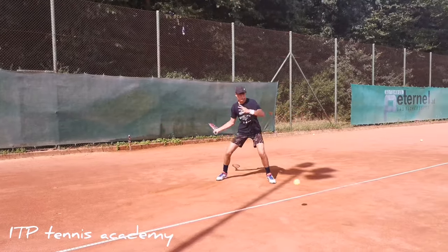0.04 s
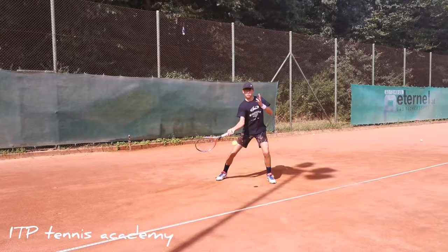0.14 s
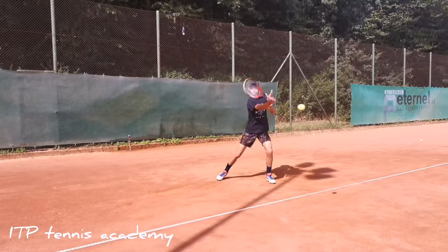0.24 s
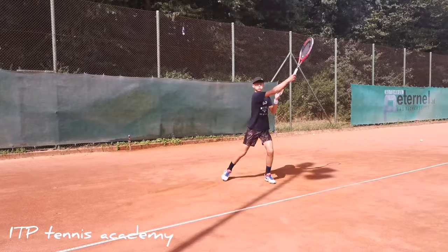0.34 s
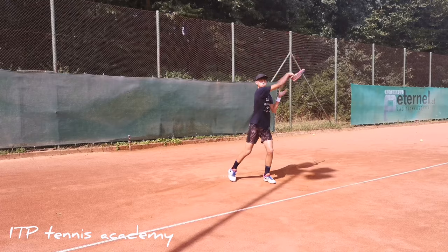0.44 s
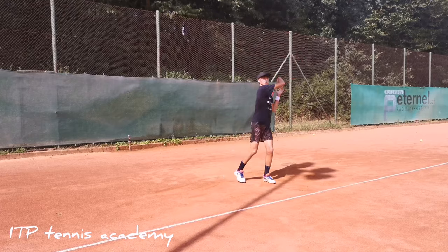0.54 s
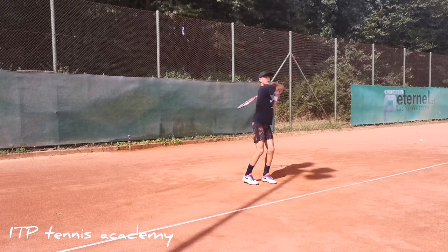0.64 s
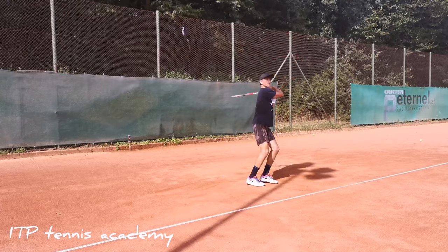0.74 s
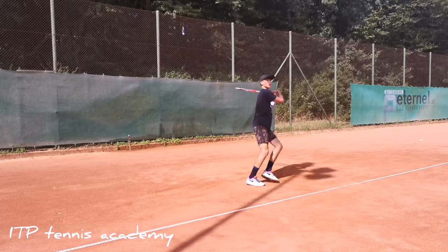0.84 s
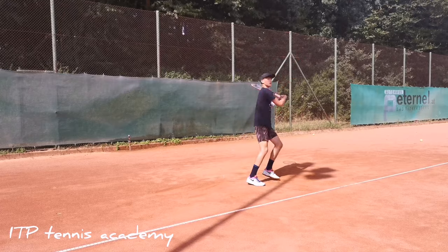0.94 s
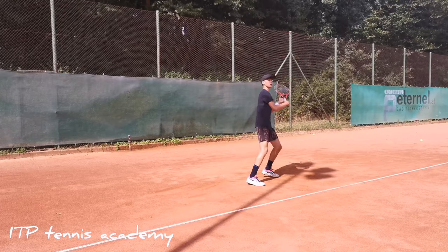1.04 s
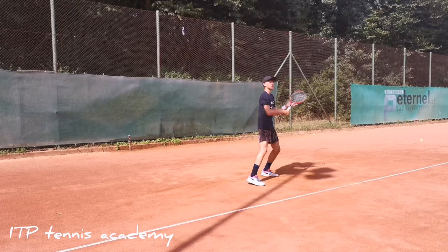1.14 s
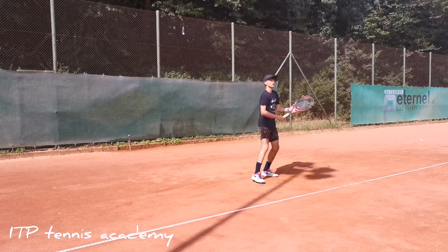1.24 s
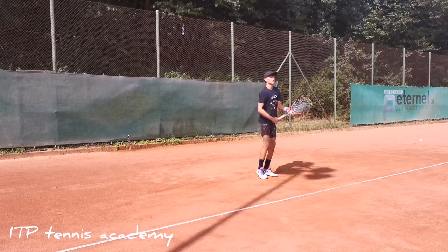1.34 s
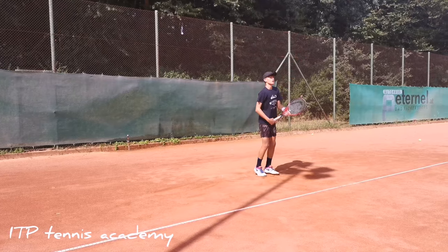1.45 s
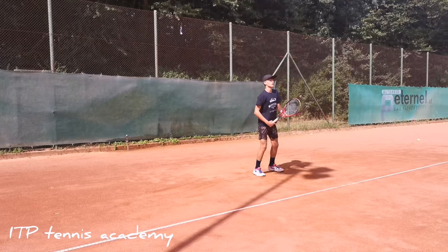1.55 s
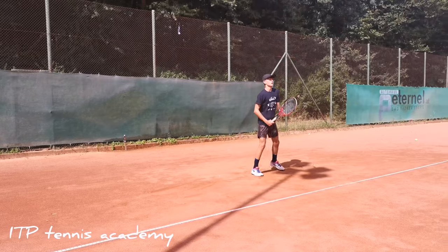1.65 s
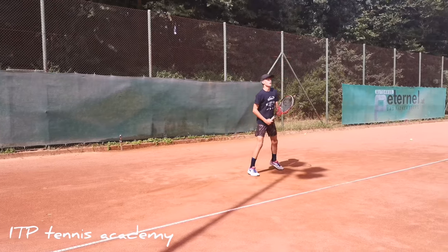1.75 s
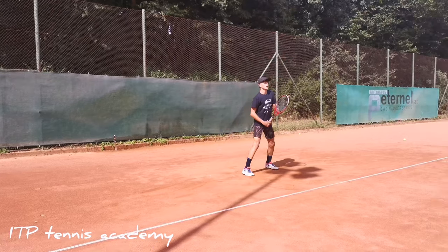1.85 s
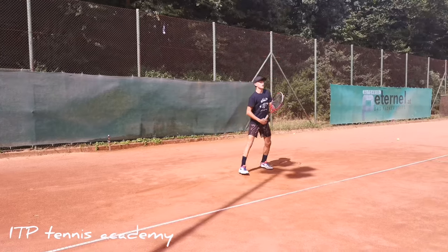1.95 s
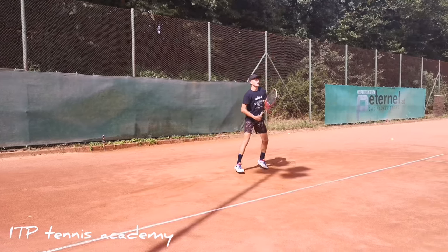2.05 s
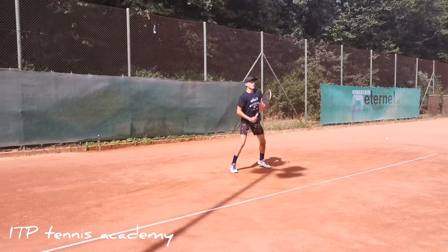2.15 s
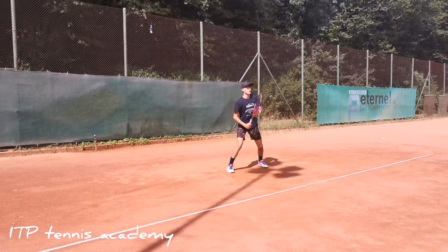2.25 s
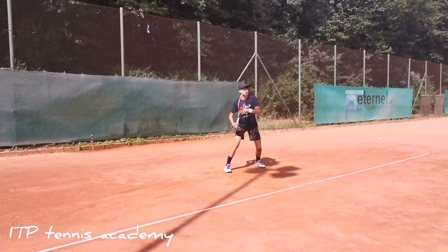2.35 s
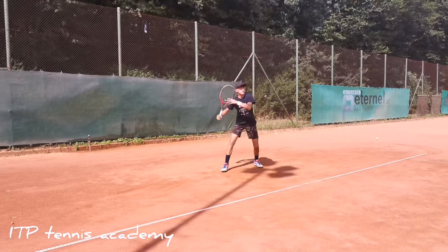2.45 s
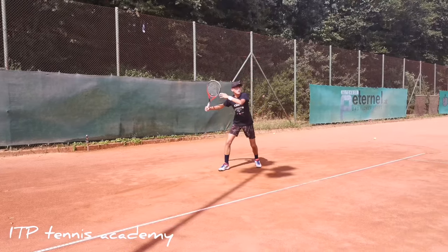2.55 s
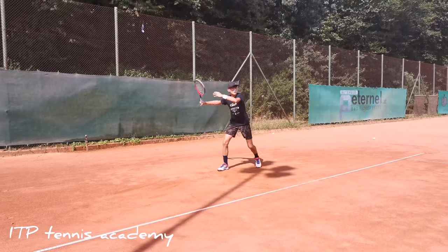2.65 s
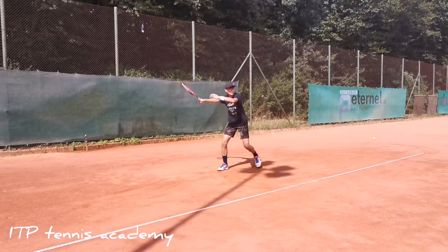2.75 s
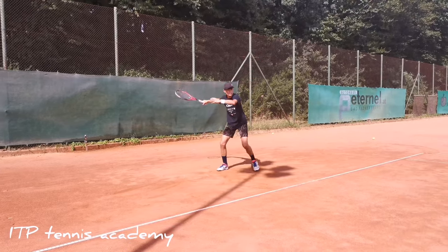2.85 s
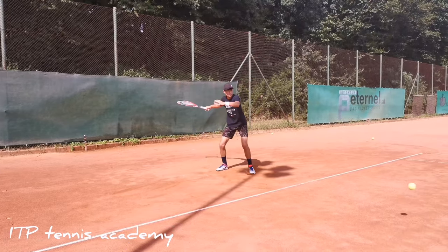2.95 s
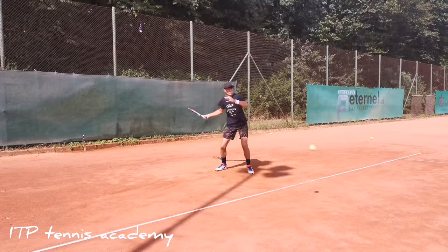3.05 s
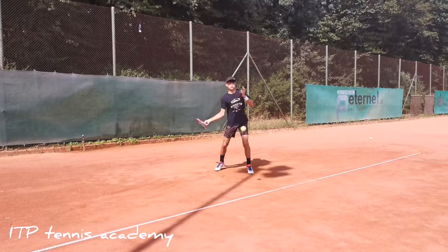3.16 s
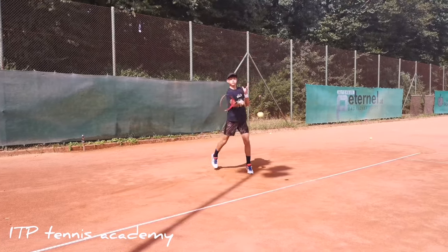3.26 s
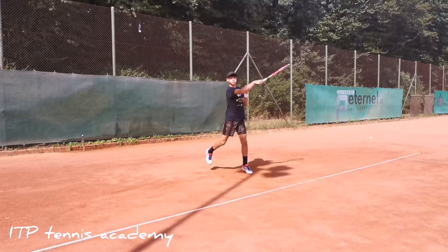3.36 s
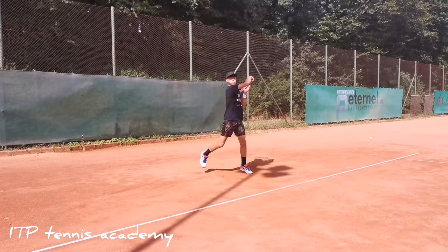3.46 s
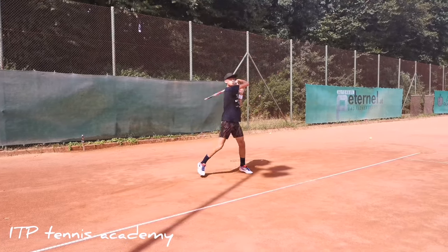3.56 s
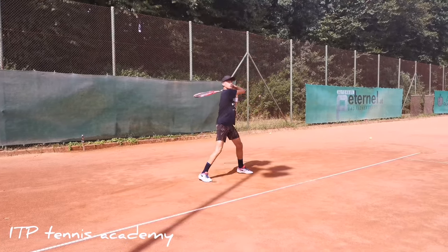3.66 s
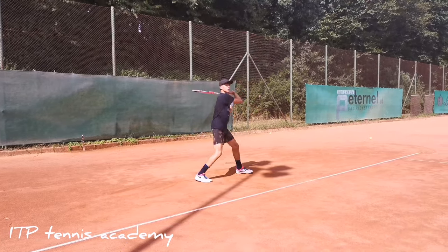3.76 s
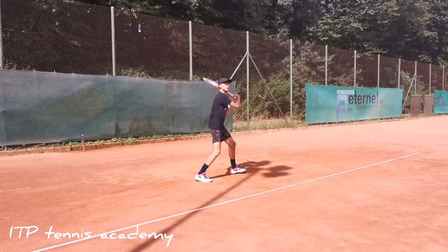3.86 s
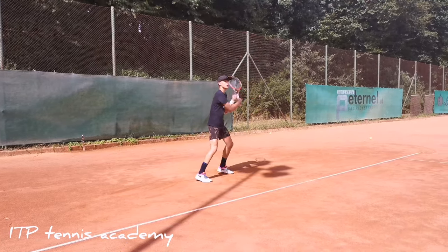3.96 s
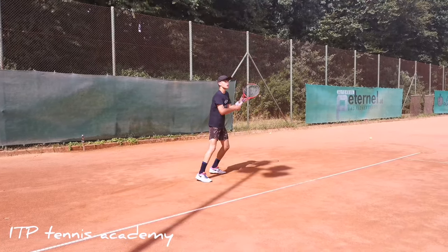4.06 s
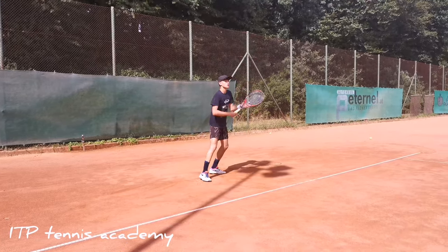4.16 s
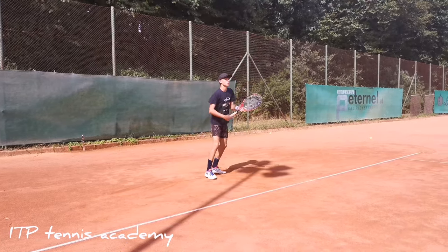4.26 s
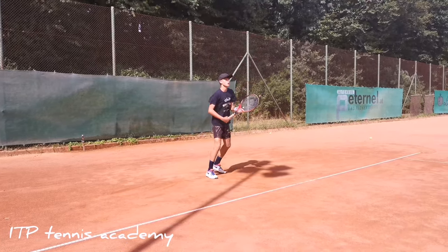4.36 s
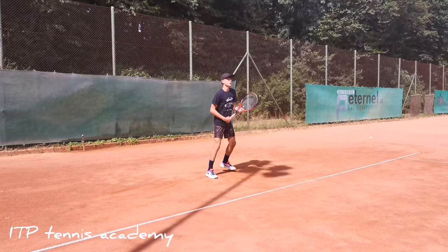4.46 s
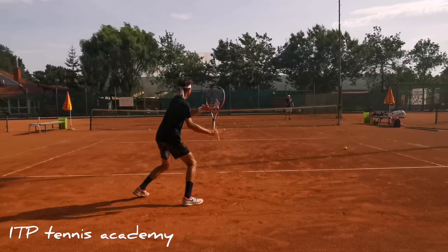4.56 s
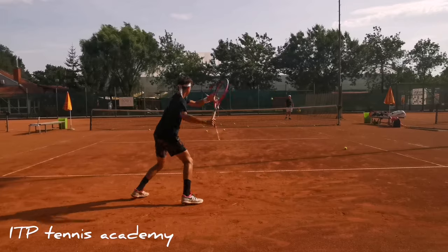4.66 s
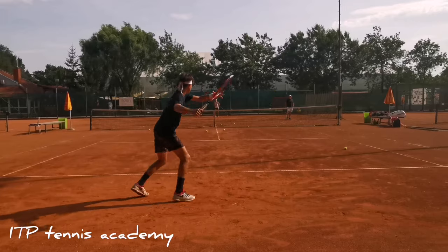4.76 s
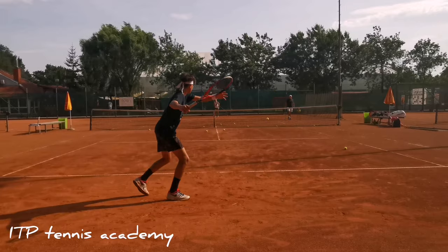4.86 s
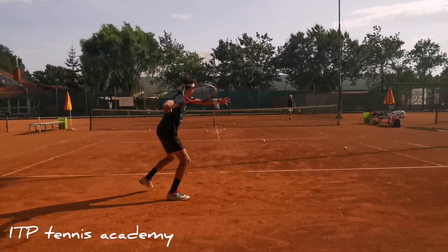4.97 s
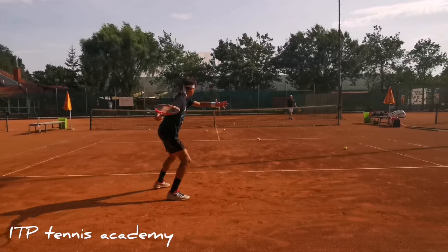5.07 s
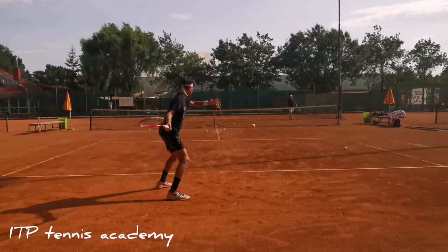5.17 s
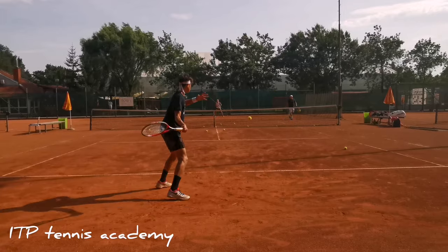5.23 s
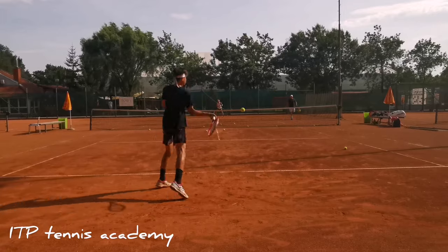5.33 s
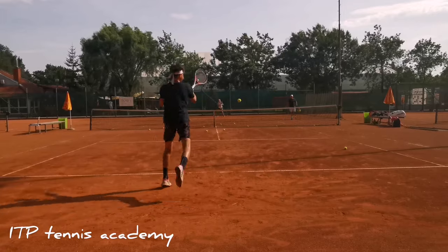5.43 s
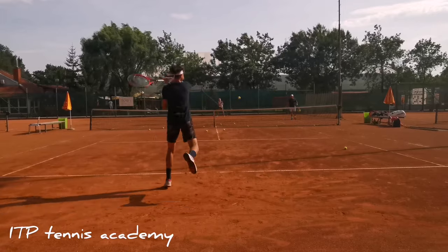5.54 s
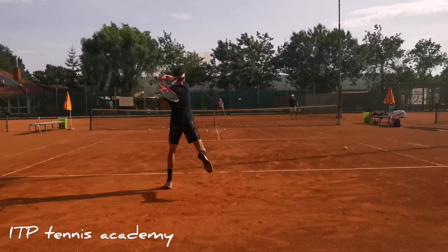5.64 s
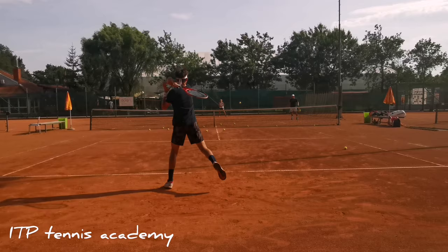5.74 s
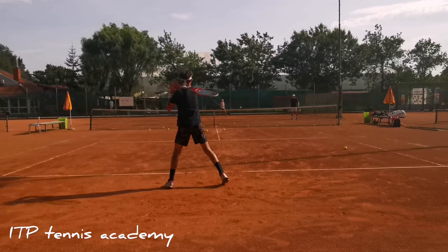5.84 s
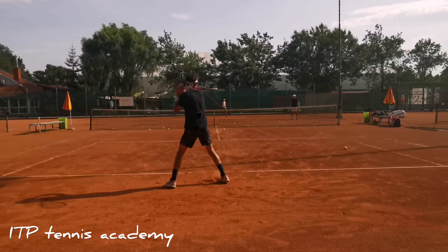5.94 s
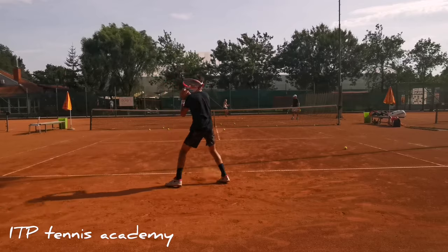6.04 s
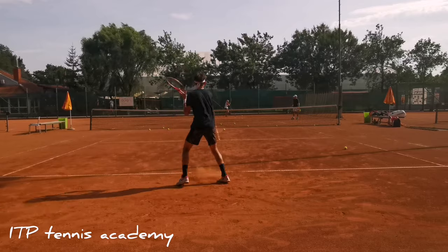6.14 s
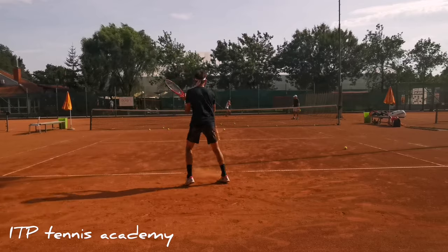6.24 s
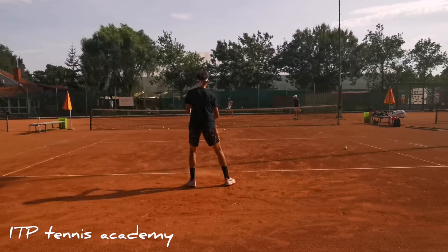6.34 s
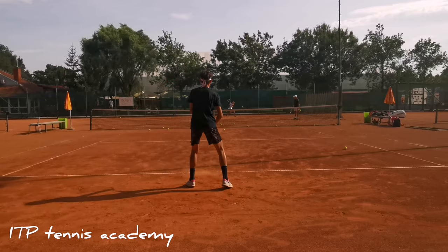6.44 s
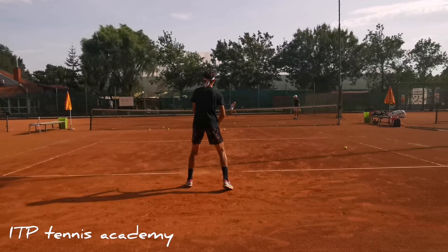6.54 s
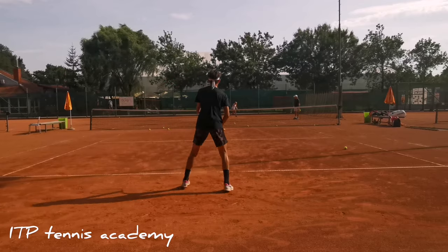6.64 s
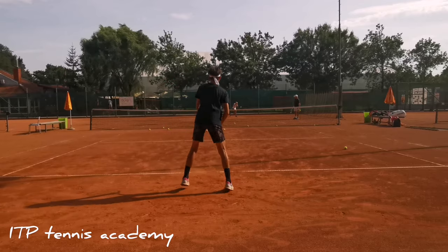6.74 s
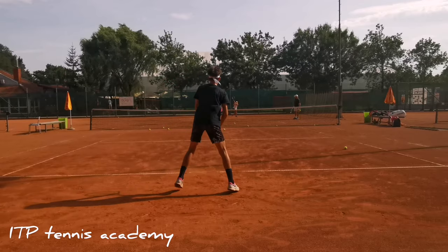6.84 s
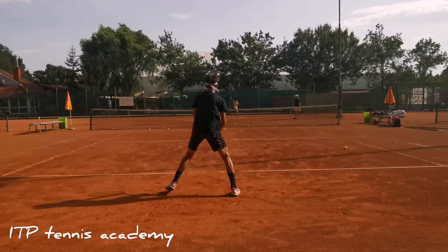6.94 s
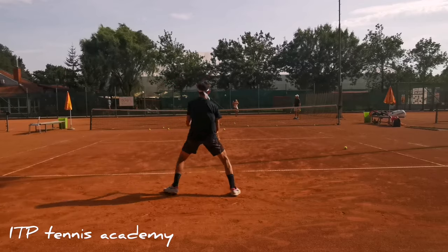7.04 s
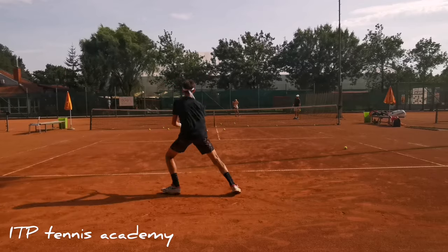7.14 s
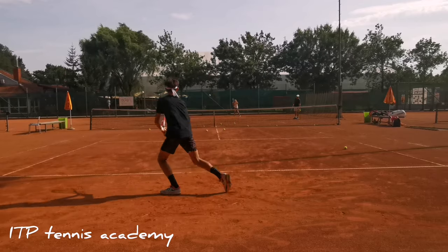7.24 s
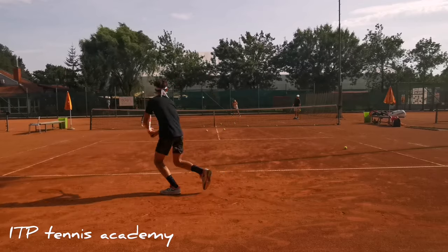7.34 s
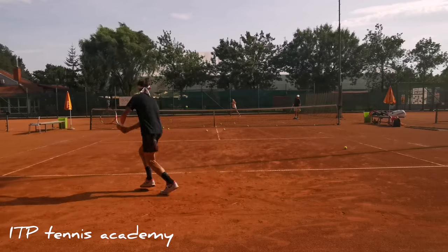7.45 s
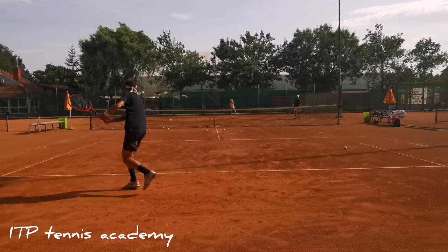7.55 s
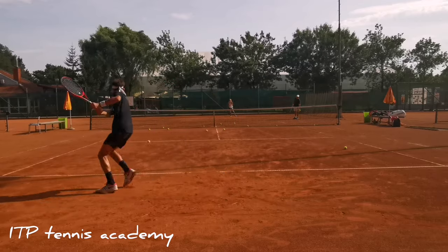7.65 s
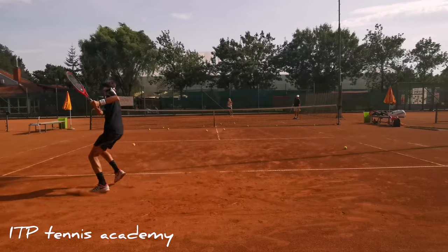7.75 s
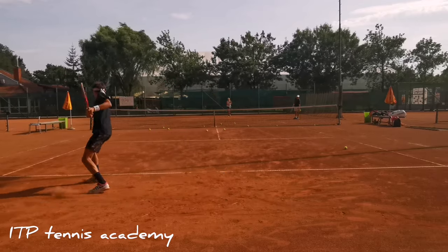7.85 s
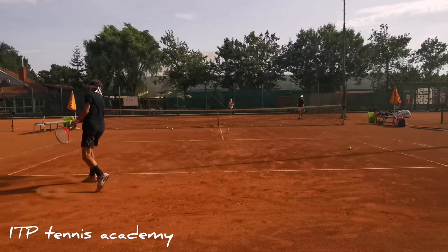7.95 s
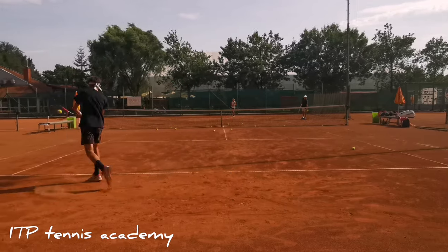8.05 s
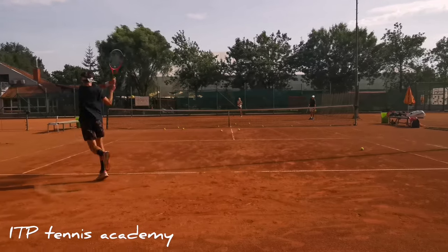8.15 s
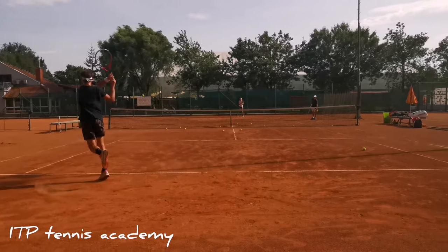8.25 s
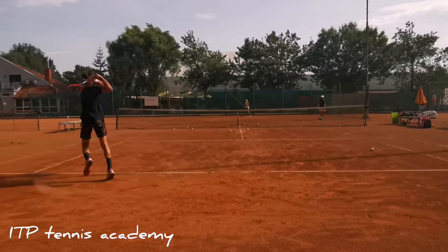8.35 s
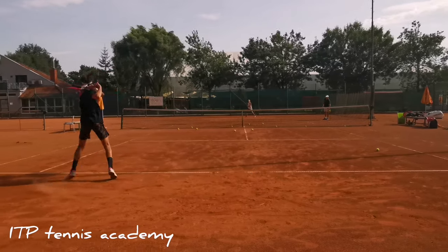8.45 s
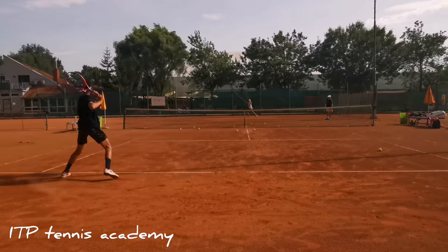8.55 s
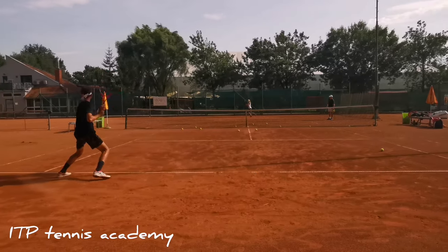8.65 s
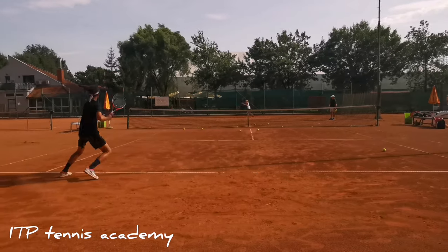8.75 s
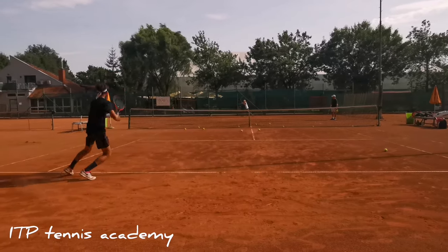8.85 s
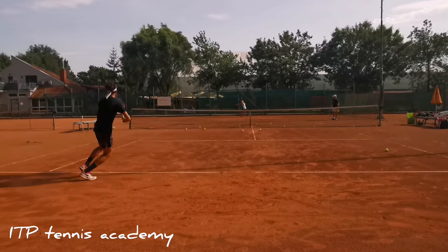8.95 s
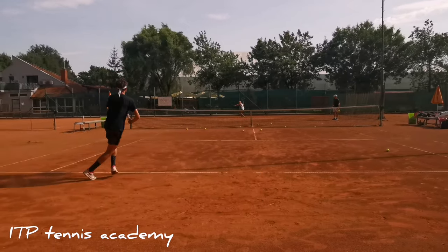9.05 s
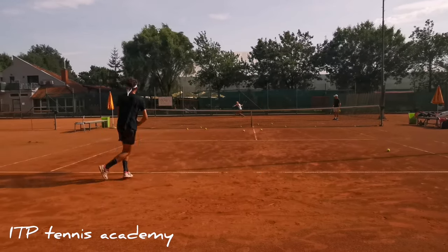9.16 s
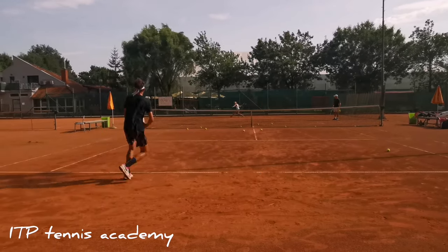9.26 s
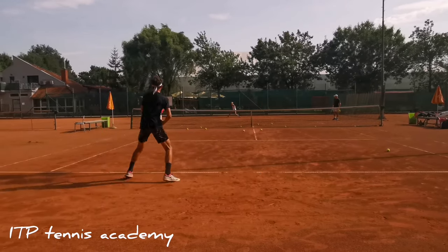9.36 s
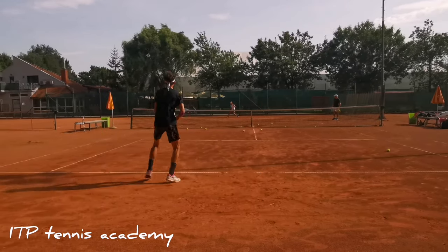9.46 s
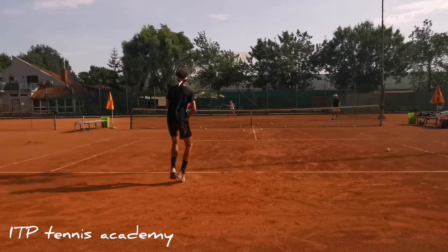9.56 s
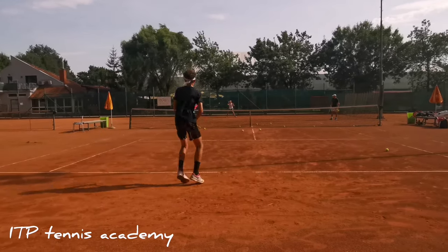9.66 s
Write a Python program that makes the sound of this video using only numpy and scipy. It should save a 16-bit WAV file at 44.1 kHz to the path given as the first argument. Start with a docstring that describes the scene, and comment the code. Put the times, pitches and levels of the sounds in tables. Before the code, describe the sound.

An outdoor clay tennis court with very quiet distant leaves and traffic hush. At 0.05 s a ball bounces with a short hollow tap, then a bright racket pop at 0.25. A shoe slides at 0.7; a faint bounce comes at 1.5 and a duller hit at 2.1. Low breeze rumbles, with wind thumps around 2.5 and strongest at 3.0-3.2, overlapping a bounce at 2.95 and a crisp, ringing hit at 3.3. Shoes scrape at 3.7-4.9, with weak bounces at 4.3 and 5.1. A deeper hit lands at 5.5, a scuff at 6.0, a muffled thuddy hit at 6.9. Loud gritty slides run 7.6-7.9 with a bounce, then a firm pop at 8.1 and another slide at 8.5. A foot thuds at 9.4; a dull final hit comes at 9.7. Each hit is dry and brief, with quick fence slaps and a soft tail.

```python
"""Tennis practice on outdoor clay

Rackets and the ground pop a hollow ball: short ringing tones, a deep thump and rasping noise.
Shoes scuff and slide in the grit, made of tiny random fractures with the weight coming on and off;
one foot thuds down, built like a bounce. Fences and trees throw back slaps and a soft noise tail.
Filtered noise and single pressure shoves make the breeze at the microphone, over a faint distant hush.
"""
import sys
import numpy as np
from scipy import signal
from scipy.fft import rfft, irfft
from scipy.io import wavfile
from scipy.ndimage import uniform_filter1d

SR = 44100
rng = np.random.default_rng(int(sys.argv[2]) if len(sys.argv) > 2 else 0)


def file_out(sig):
    """Save sig as 16-bit WAV at sys.argv[1]."""
    # one column per channel
    cols = np.atleast_2d(sig).T
    # limit, then scale
    lim = np.clip(cols, -1, 1)
    pcm = np.round(lim * 32767).astype(np.int16)
    wavfile.write(sys.argv[1], SR, pcm)


N = 427769
T = np.arange(N) / SR  # time of every sample, s

# breeze: a trim on its level, and how much and how fast each side wavers on its own
BREEZE_TRIM_DB, BUFFET_DB, BUFFETS_PER_S = -1, 3, 16
# weaker eddies come at random, one in each gap, and grow with the breeze
EDDY_GAP_S, EDDY_OVER_BREEZE_DB, EDDY_HZ, EDDY_SIDE_DB = 0.35, 15, 105, 16

SLIDE_STOP = 1.44  # a braking sole dies away as exp(-(time / slide) ** this)
SETTLE_DB, SETTLE_T60_S = -28, 0.25  # faint longer fade of the disturbed clay
# centre of the crunch: it rises with the grit level, up to 0 dB
CRUNCH_HZ, CRUNCH_OCTAVES_PER_DB = 2140, 0.04
# light steps throughout
STEP_GAP_S, STEP_SCATTER_S, STEP_RISE_S, STEP_SLIDE_S = 0.34, 0.06, 0.023, 0.023
STEP_DB, STEP_GRIT_DB = -65, 1.5

SHELL_HZ, SHELL_T60_S = 942, 0.034  # T60: time to fade by 60 dB
# what all landings on clay share; dB count from the landing's level, the shell's from its pop
LANDING_THUMP_HZ, LANDING_POP_HZ = 197, 928
LANDING_TONE_DB, LANDING_SHELL_DB, LANDING_OVERTONE_DB, LANDING_STRETCH = -4, -5.5, -13, 0.91
LANDING_CRACK_DB, LANDING_BUZZ_DB = -11.5, -21  # before the rasp's tone shaping
LANDING_BROAD_ECHO_DB, LANDING_SHELL_ECHO_DB = -14.5, -20.5

STROKE_PAN_DB = 1.1  # left minus right
# a punchy stroke pops the ball harder; thump and shell follow: dB at no punch, dB per dB of punch
THUMP_DB, THUMP_PER_PUNCH = -4.5, 0.59
SHELL_DB, SHELL_PER_PUNCH = -10.5, 0.7
# a shorter contact raises the pop; the thump rises with it (octaves per octave) and thins
POP_HZ, THUMP_HZ, THUMP_FOLLOWS, THUMP_DB_PER_OCTAVE = 888, 270, 2.5, -8.5
BUZZ_DB = -10  # counted from the treble
# a stroke with less treble than BRIGHT_DB also echoes duller
BRIGHT_DB, ECHO_EDGE_DB_PER_DB = -10, 0.4
GROUND_DELAY_S, GROUND_DB = 0.010, -19.5  # the nearest reflection


def undb(db):
    """Turn decibels into a plain gain."""
    return 10 ** (np.asarray(db) / 20)


def unit(x):
    """Scale to an average strength (rms) of 1."""
    return x / np.sqrt(np.mean(x ** 2))


def burst(x, db):
    """Scale a short sound so that its energy, taken over 10 ms, gives this level."""
    return x * undb(db) / np.sqrt(np.sum(x ** 2) / (SR / 100))


def colour(x, points, scale=1):
    """Shape the tone through (Hz, dB) points with a filter that never sounds ahead of its input."""
    size = 8192
    hz, db = np.transpose(points)
    grid = np.maximum(np.fft.rfftfreq(size, 1 / SR), 1)
    gain_db = np.interp(np.log(grid), np.log(hz * scale), db)
    # folding the cepstrum (spectrum of the log gain) onto positive times removes any early sound
    cepstrum = irfft(np.log(undb(gain_db)))
    cepstrum[1:size // 2] *= 2
    cepstrum[size // 2 + 1:] = 0
    response = irfft(np.exp(rfft(cepstrum)))
    return signal.fftconvolve(x, response)[:len(x)]


def pan(db):
    """Left and right gains for a left-minus-right level, at constant power."""
    gains = undb(np.array([[db], [-db]]) / 2)
    return unit(gains)


def spread(mid, side):
    """Make left and right from a shared part and an opposed part."""
    return np.array([mid + side, mid - side])


def add(out, s, x):
    """Mix x in at time s, in seconds."""
    i = int(s * SR)
    out[:, i:i + x.shape[-1]] += x[..., :N - i]


def walk(rate):
    """Wander smoothly: random levels held for 1 / rate seconds, then averaged twice."""
    k = int(SR / rate)
    steps = np.repeat(rng.standard_normal(N // k + 1), k)
    smooth = uniform_filter1d(uniform_filter1d(steps, k), k)
    return unit(smooth[:N])


def swell(t, rise, t60):
    """Rise with a rounded edge, then fade by 60 dB in t60 seconds."""
    attack = np.sin(np.pi / 2 * np.clip(t / rise, 0, 1)) ** 2
    return attack * np.exp(-np.log(1000) * np.maximum(t - rise, 0) / t60)


def ring(t, hz, rise, t60):
    """A vibration that builds up during the contact and then dies."""
    return swell(t, rise, t60) * np.sin(2 * np.pi * hz * t)


def push(t, hz):
    """Pressure of one brief shove: a peak between two shallow troughs."""
    u = (np.pi * hz * t) ** 2
    return (1 - 2 * u) * np.exp(-u)


def breeze():
    """Turbulence rumbles separately on each side of the microphone; now and then an eddy thuds."""
    # strength of the breeze before the trim: t/s, level/dB
    strength = [(0.0, -39), (0.66, -60.5), (0.78, -50.5), (2.88, -43.5), (3.12, -33), (3.3, -47.5),
                (4.5, -59.5), (4.56, -74), (4.92, -62), (5.04, -82), (5.76, -57), (6.66, -74), (7.8, -87),
                (8.04, -70), (8.22, -80), (8.64, -60), (8.94, -79), (9.68, -61)]
    # tone of the rumble: f/Hz, level/dB
    rumble_tone = [(15, -7), (38, 0), (54, 1), (100, -7), (160, -17.5), (250, -30.5), (500, -41),
                   (1500, -77.5)]
    # single eddies of the strongest gust: t/s, peak level over both sides/dB, f/Hz, left minus right/dB
    gust_eddies = [(2.487, -28, 96, 16), (2.594, -26.5, 87, 30), (2.988, -16.5, 160, -26),
                   (3.047, -24.5, 128, -24), (3.144, -16.5, 195, -24), (3.190, -24, 140, -28),
                   (3.239, -27, 168, -26)]
    db = np.interp(T, *np.transpose(strength)) + BREEZE_TRIM_DB
    sides = []
    for _ in range(2):
        rumble = unit(colour(rng.standard_normal(N), rumble_tone))
        sides.append(rumble * undb(db + BUFFET_DB * walk(BUFFETS_PER_S)))
    out = np.array(sides)

    half = 1 / 20  # s, half the length of one eddy
    t = T[:SR // 10] - half
    weak = []
    for start in np.arange(half, T[-1] - EDDY_GAP_S, EDDY_GAP_S):
        s = start + EDDY_GAP_S * rng.random()
        peak_db = np.interp(s, T, db) + EDDY_OVER_BREEZE_DB
        weak.append((s, peak_db, EDDY_HZ, EDDY_SIDE_DB * rng.choice([-1, 1])))
    for s, peak_db, hz, side_db in gust_eddies + weak:
        add(out, s - half, push(t, hz) * undb(peak_db) * pan(side_db) / np.sqrt(2))
    return out


def hush():
    """Far leaves and traffic, alike in both ears and barely swelling, and an even wide hiss."""
    # tone of distant trees and traffic: f/Hz, level/dB
    far_tone = [(20, -2), (90, 0), (170, 2), (400, -1), (900, -5.5), (2000, -11), (4000, -17),
                (7000, -19.5), (15000, -19.5)]
    sway = undb(0.5 * walk(2) + 0.4 * walk(12))
    far = unit(colour(rng.standard_normal(N), far_tone)) * sway
    hiss = rng.standard_normal(N)
    return spread(undb(-57) * far, undb(-64) * hiss)


def grains(size, uneven_db):
    """Dense tiny fractures of unequal strength, on about a quarter of the samples."""
    strength = undb(uneven_db * np.minimum(rng.exponential(size=size), 3))
    return rng.standard_normal(size) * strength * (rng.random(size) < 0.25)


def scuff(rise, slide, db, grit_db):
    """A sole crushes the clay as the weight comes on, sprays loose grit and brakes to a stop."""
    # clay crushed under a sole: f/multiple of the crunch centre, level/dB
    crunch_tone = [(.05, -7), (.22, -16), (.37, 0.5), (.5, -7), (.72, -1), (1.1, -0.5), (1.5, -3),
                   (2.2, -11), (4.5, -35)]
    # loose grains skittering: f/Hz, level/dB
    grit_tone = [(300, -37), (1500, -11), (3500, 5.5), (5500, 5.5), (7500, 2), (15000, -4.5)]
    t = T[:SR // 2]
    hz = CRUNCH_HZ * 2 ** (CRUNCH_OCTAVES_PER_DB * min(grit_db, 0))
    crunch = [unit(colour(grains(len(t), uneven_db=1.5), crunch_tone, hz)) for _ in range(2)]
    grit = [unit(colour(grains(len(t), uneven_db=1.5), grit_tone)) for _ in range(2)]
    # the sole catches and slips
    slips = undb(0.62 * unit(uniform_filter1d(rng.standard_normal(len(t)), size=200)))
    braking = np.exp(-(np.maximum(t - rise, 0) / slide) ** SLIDE_STOP)
    weight = swell(t, rise, np.inf) * braking
    settling = undb(SETTLE_DB) * swell(t, rise, SETTLE_T60_S)
    crushed = spread(crunch[0], 0.12 * crunch[1])
    loose = undb(grit_db - 1.5) * spread(grit[0], 0.56 * grit[1])
    return undb(db) * (crushed + loose) * slips * np.hypot(weight, settling)


def surroundings(x):
    """Many weak reflections from fences and foliage build up slowly and fade, each band at its own pace."""
    # tail from fences and trees: f/Hz, level before the overall -36 dB/dB, fade by 60 dB/s
    tail = [(125, -9, 0.53), (257, 0, 1), (480, 0.5, 0.73), (970, -5, 1), (1730, 0, 0.28),
            (3670, 1.5, 0.65), (7370, 1.5, 0.49), (13050, -3, 0.52)]
    t = T[:SR]
    wet = np.zeros((2, SR))
    clusters = undb(2 * walk(rate=140)[:SR])  # reflections bunch unevenly
    for hz, db, t60 in tail:
        edges = [hz * 0.7, min(hz * 1.42, SR * 0.45)]
        band = signal.butter(2, edges, "band", fs=SR, output="sos")
        mid, side = signal.sosfilt(band, rng.standard_normal((2, SR)) * clusters)
        width = min(0.054 + hz / 9000, 1)  # higher bands are wider
        near = swell(t - 0.01, rise=0.02, t60=t60)
        far = swell(t - 0.07, rise=0.061, t60=t60)
        wet += undb(db) * (near + 0.35 * far) * spread(mid, width * side)
    return signal.fftconvolve(x, wet * undb(-36), axes=1)[:, :N]


def footwork():
    """Scuffs and slides on the clay, with light steps at a loose pace throughout and a faint tail."""
    # shoes pushing off and sliding: t/s, rise/s, slide/s, level/dB,
    # loose grit from that level, before a shared -1.5 dB/dB
    slides = [ (0.000, 0.0018, 0.051, -50, -9.5), (0.715, 0.049, 0.067, -48, -9.5),
              (1.429, 0.029, .075, -60, 0.5), (2.191, 0.017, .15, -57.5, -3),
              (2.550, 0.034, .08, -56.5, -9), (2.960, 0.04, 0.053, -45, -14.5),
              (3.696, 0.011, .062, -47, -6.5), (4.045, .067, 0.037, -52.5, -10),
              (4.345, 0.029, 0.035, -53.5, -1), (4.635, .027, 0.026, -58, -5),
              (4.785, .04, 0.031, -57.5, -9), (4.862, 0.023, 0.042, -56, -1.5),
              (5.130, .042, 0.034, -57, -4.5), (5.960, 0.018, 0.046, -43.5, -9.5),
              (6.516, 0.042, 0.059, -51, -15), (7.576, 0.031, 0.02, -36.5, -5.5),
              (7.743, 0.0087, 0.046, -43.5, -4), (7.759, 0.029, 0.024, -40.5, -10),
              (7.884, 0.037, 0.05, -39.5, -17.5), (8.058, 0.01, .02, -66.5, 9.5),
              (8.540, 0.031, .06, -40.5, -6), (8.600, 0.14, 0.06, -56, 5),
              (9.414, 0.034, 0.025, -47, -12.5), ]
    out = np.zeros((2, N))
    for s, *shape in slides:
        add(out, s, scuff(*shape))
    for s in np.arange(STEP_GAP_S, T[-1], STEP_GAP_S):
        when = np.clip(s + STEP_SCATTER_S * rng.standard_normal(), 0, T[-1])
        add(out, when, scuff(STEP_RISE_S, STEP_SLIDE_S, STEP_DB, STEP_GRIT_DB))
    return out + undb(-20) * surroundings(out)


def pop(thump_db, thump_hz, tone_hz, tone_db, pop_hz, pop_db, shell_db, overtone_db, stretch,
        crack_db, buzz_db):
    """The contact thumps and cracks, a ball pops back into shape, and its shell rings on briefly."""
    # higher modes of the struck ball and strings: f before stretch/Hz, level among them/dB, fade by 60 dB/s
    overtones = [(1410, -2, 0.018), (1681, 4.5, 0.033), (1877, -3.5, 0.034), (2194, -5, 0.019),
                 (2525, 5, 0.016), (2860, -16.5, 0.021), (3750, -31, 0.012)]
    t = T[:SR // 8]
    # so small a body radiates little deep bass
    small_body = [(40, -30.5), (95, -14.5), (170, -2), (2000, 3)]
    thump = burst(colour(push(t - 0.0024, thump_hz), small_body), thump_db)
    tone = -burst(ring(t, tone_hz, rise=0.002, t60=0.016), tone_db)
    ball = burst(ring(t - 0.0012, pop_hz, rise=0.00504, t60=0.014), pop_db)
    shell = burst(ring(t - 0.0072, SHELL_HZ, rise=0.0024, t60=SHELL_T60_S), shell_db)
    modes = sum(undb(db) * ring(t - 0.0007, hz * stretch, rise=0.0032, t60=t60)
                for hz, db, t60 in overtones)
    # felt grinds on strings or clay, and a fine buzz lingers after it
    crack = burst(swell(t, rise=0.0028, t60=0.014), crack_db)
    buzz = burst(swell(t, rise=0.0069, t60=0.22), buzz_db)
    rasp_tone = [(300, 9), (1500, 9.5), (3500, 3), (4600, 1), (7000, -0.5), (15000, 0)]
    rasp = [colour(rng.standard_normal(len(t)) * (crack + buzz), rasp_tone) for _ in range(2)]
    mid = thump + tone + ball + shell + burst(modes, overtone_db) + rasp[0]
    return spread(mid, undb(-6.5) * rasp[1])


def radiate(broad_db, shell_db, edge_db):
    """What leaves toward the fences: a broad smack, its top shifted by edge_db, and the shell's note."""
    # tone of the smack, broader than on the way to the microphone: f/Hz, level/dB
    smack_tone = [(100, -18), (250, -2), (400, 0.5), (560, 1), (780, 1.5), (1050, 2), (1350, -7.5),
                  (1900, -10), (2500, -10.5), (3200, -19), (8000, -23.5), (15000, -25)]
    t = T[:SR // 8]
    smack = colour(signal.unit_impulse(len(t)), smack_tone)
    smack = colour(smack, [(1000, 0), (2000, edge_db)])
    shell = ring(t - 0.006, 0.957 * SHELL_HZ, rise=0.0031, t60=0.011)
    return burst(smack, broad_db) + burst(shell, shell_db)


def landings():
    """Each bounce on clay, and one footfall built the same way, as (s, sound, what the fences get)."""
    # the ball landing; the last row, 9.414, is a foot thudding down on the clay:
    # t/s, level/dB, contact tone f/Hz, punch (pop from the level)/dB, left minus right/dB
    impacts = [ (0.0495, -34.5, 1270, -3, 4.5), (1.462, -51, 600, 0.5, 0.5), (2.9498, -37.5, 1310, 3, -2),
               (4.3040, -49, 610, -5.5, -1), (5.1020, -47, 1260, -9, 2), (6.244, -58, 600, -3, 1),
               (7.8130, -43, 1220, -9, 0.5), (9.0880, -64, 600, 6, 2), (9.414, -47.5, 514, -12, 0.5), ]
    for s, db, tone_hz, punch, pan_db in impacts:
        sound = pop(thump_db=0, thump_hz=LANDING_THUMP_HZ, tone_hz=tone_hz, tone_db=LANDING_TONE_DB,
                    pop_hz=LANDING_POP_HZ, pop_db=punch, shell_db=punch + LANDING_SHELL_DB,
                    overtone_db=LANDING_OVERTONE_DB, stretch=LANDING_STRETCH,
                    crack_db=LANDING_CRACK_DB, buzz_db=LANDING_BUZZ_DB)
        sent = radiate(LANDING_BROAD_ECHO_DB, LANDING_SHELL_ECHO_DB, edge_db=6)
        yield s, sound * undb(db) * pan(pan_db), sent * undb(db)


def strokes():
    """Each racket stroke, its parts balanced by punch and treble, as (s, sound, what the fences get)."""
    # racket strokes: t/s, level/dB, contact tone f/Hz, pop f/Hz, punch/dB, overtones/dB,
    # overtone stretch/factor, treble before the rasp's tone shaping/dB, broad echo/dB, shell echo/dB;
    # every later dB counts from the level
    hits = [ (0.2548, -28, 623, 925, 12, -4, 1.387, -3.6, -8, -16.5),
            (2.0841, -30, 425, 911, -0.5, -10.5, 0.99, -14.5, -10.5, -8),
            (3.3160, -27, 665, 855, 12.5, 4.5, 0.975, -1.8, -5.5, -14),
            (5.4906, -26.5, 550, 716, -3.5, -17, 0.73, -7.5, -20.5, -16),
            (6.8769, -27, 552, 1020, -8.5, -45, 0.7, -26, -14, -35),
            (8.1356, -28.5, 606, 785, 7.5, -4.5, 0.985, -6.5, -17, -10.5),
            (9.6778, -30.5, 543, 1014, -4, -26, 1.16, -19, -20, -23), ]
    for s, db, tone_hz, pop_hz, punch, overtone_db, stretch, treble, broad_db, shell_db in hits:
        octaves = np.log2(pop_hz / POP_HZ)
        thump_db = THUMP_DB + THUMP_PER_PUNCH * punch + THUMP_DB_PER_OCTAVE * octaves
        thump_hz = THUMP_HZ * 2 ** (THUMP_FOLLOWS * octaves)
        sound = pop(thump_db=thump_db, thump_hz=thump_hz, tone_hz=tone_hz, tone_db=0.5,
                    pop_hz=pop_hz, pop_db=punch, shell_db=SHELL_DB + SHELL_PER_PUNCH * punch,
                    overtone_db=overtone_db, stretch=stretch,
                    crack_db=treble, buzz_db=treble + BUZZ_DB)
        edge_db = ECHO_EDGE_DB_PER_DB * min(treble - BRIGHT_DB, 0)
        sent = radiate(broad_db, shell_db, edge_db)
        yield s, sound * undb(db) * pan(STROKE_PAN_DB), sent * undb(db)


def rally():
    """All landings and strokes, with a ground reflection, slaps from the fences and a soft tail."""
    # slaps from the fences: delay/s, level/dB
    slaps = [(0.0359, -11.5), (0.066, -15), (0.125, -30.5)]
    direct, sent = np.zeros((2, N)), np.zeros((2, N))
    for s, sound, radiated in [*landings(), *strokes()]:
        add(direct, s, sound)
        add(sent, s, radiated)
    out = direct + surroundings(sent)
    add(out, GROUND_DELAY_S, direct * undb(GROUND_DB))
    for delay, db in slaps:
        add(out, delay, sent * undb(db))
    return out


def scene():
    """The court: breeze, distant hush, shoes and ball together."""
    return breeze() + hush() + footwork() + rally()


def record(dry):
    """A small microphone with a treble peak, a fall above it and a steep cut at the very top."""
    # microphone response: f/Hz, level/dB
    response = [(20, 0), (5000, 0), (6800, 1.5), (7600, 5), (8100, -2.5), (8700, -8), (10000, -17.5),
                (12000, -23), (15000, -26)]
    top_hz = 15300
    coloured = np.array([colour(channel, response) for channel in dry])
    steep_cut = signal.ellip(8, 0.2, 70, top_hz, fs=SR, output="sos")
    return signal.sosfilt(steep_cut, coloured)


dry = scene()
out = record(dry)
file_out(out)
```